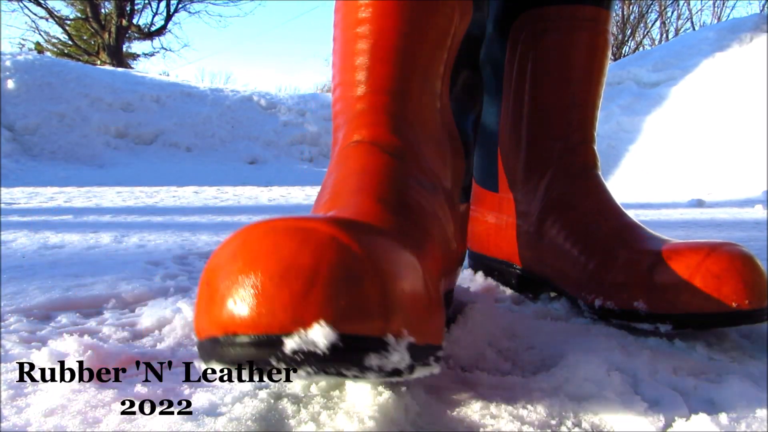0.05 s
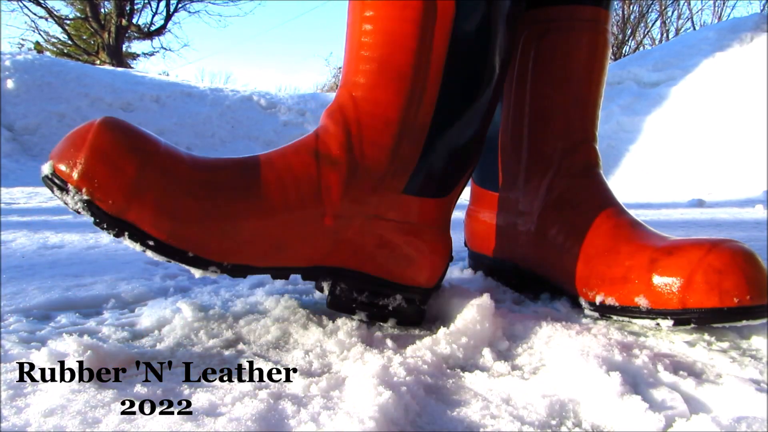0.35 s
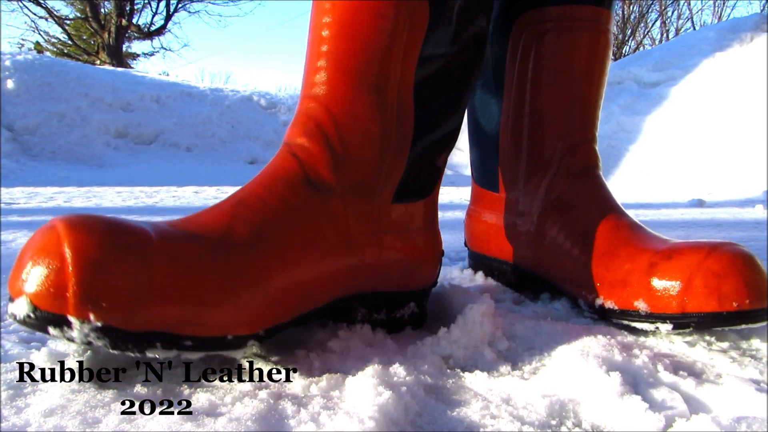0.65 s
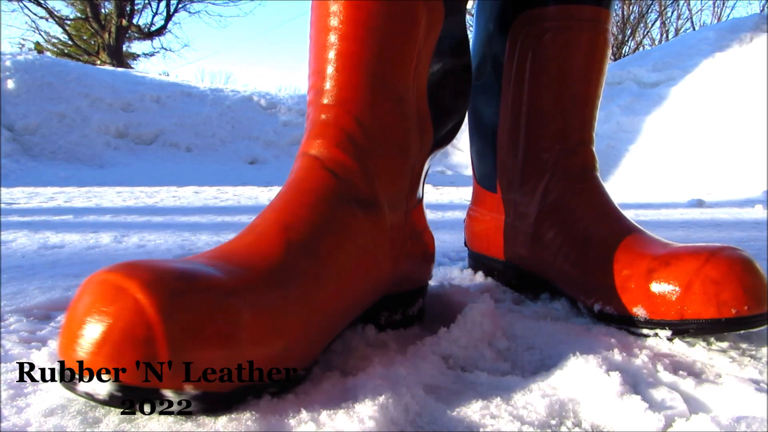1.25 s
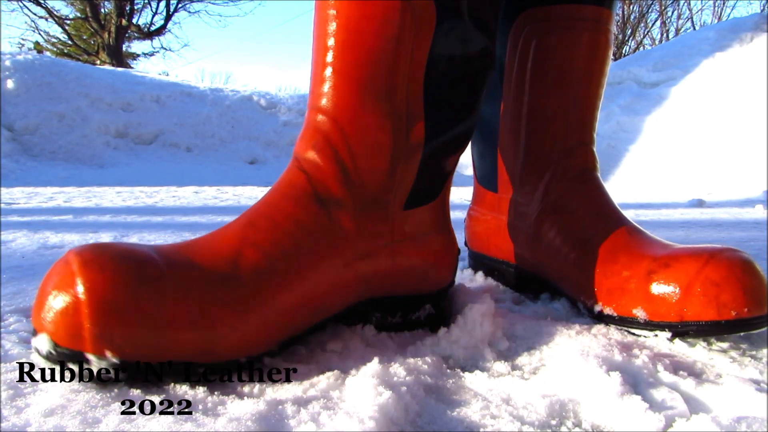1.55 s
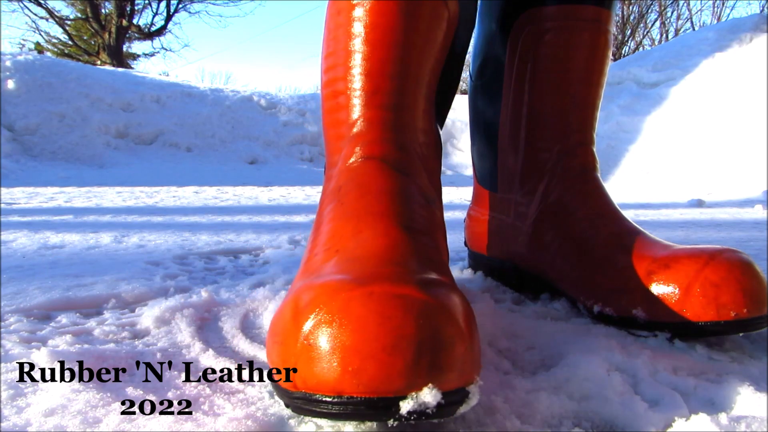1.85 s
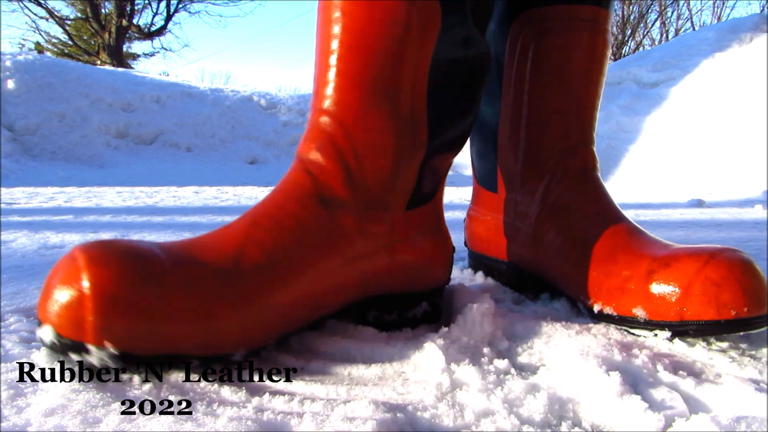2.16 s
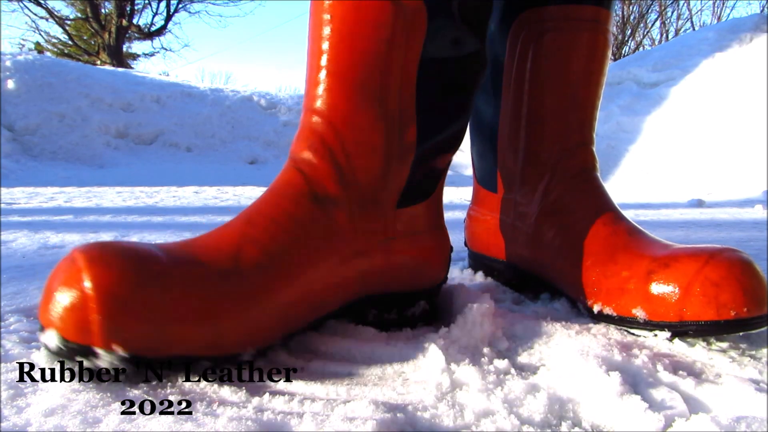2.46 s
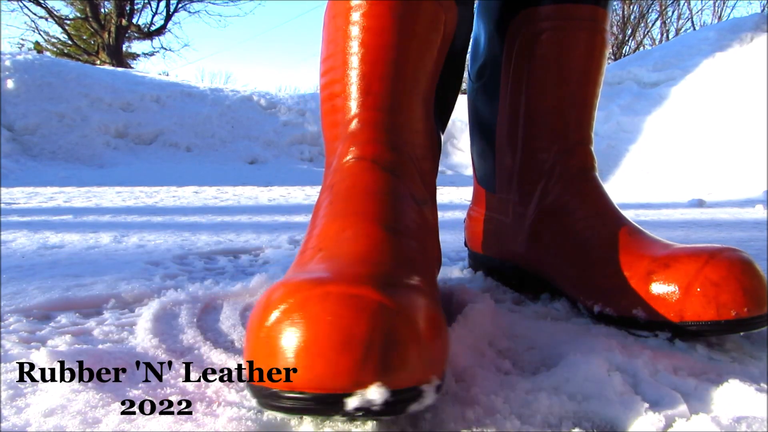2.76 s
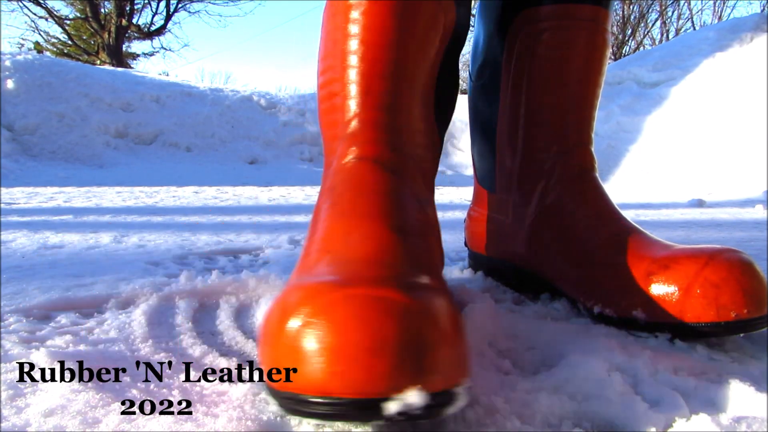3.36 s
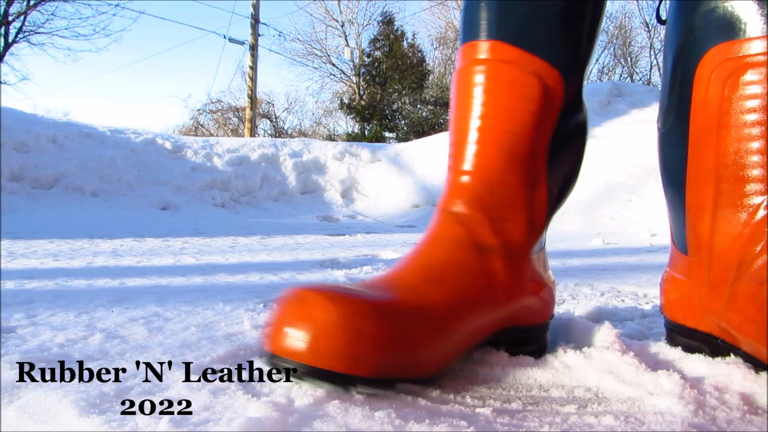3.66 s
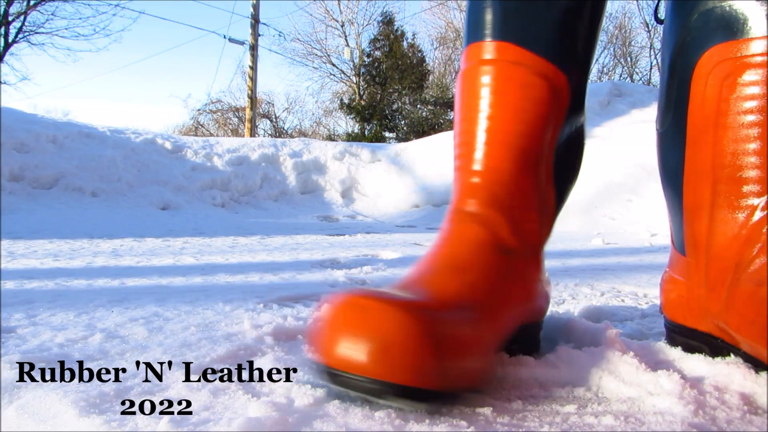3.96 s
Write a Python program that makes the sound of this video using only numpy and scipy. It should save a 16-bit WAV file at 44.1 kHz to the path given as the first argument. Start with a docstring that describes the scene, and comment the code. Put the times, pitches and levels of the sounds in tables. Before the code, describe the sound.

Crusty snow crunches under a rubber boot, close and slightly left. The boot shifts quietly with soft bumps, then sweeps to and fro about twice a second, with ticking ice bits and sharp little cracks. Faint outdoor air lies behind.

```python
"""A light scuff on crusty packed snow, close to the microphone and a little to the left: a rubber boot
shifts, flexes with soft thuds, then sweeps back and forth. Each sweep crushes a dense, jerky shower of
ice grains; loose bits tick, and now and then a piece of crust snaps. Behind it lie distant outdoor air,
a breeze on the microphone and the recorder's thin whine. Near the end the sound drops out for a moment."""
import sys
import numpy as np
from scipy import signal
from scipy.fft import rfft, irfft
from scipy.io import wavfile
from scipy.ndimage import uniform_filter1d

SR = 44100
rng = np.random.default_rng(int(sys.argv[2]) if len(sys.argv) > 2 else 0)


def bounce(signal):
    """Save signal as a 16-bit WAV file at the path given by the first command-line argument."""
    frames = np.transpose(np.atleast_2d(signal))
    limited = np.clip(frames, -1, 1)
    pcm = np.round(limited * 32767).astype(np.int16)
    wavfile.write(sys.argv[1], SR, pcm)


N = 176400

# Grain sizes underfoot: packed snow, crumbs, crust, powder
# (low edge [Hz], high edge [Hz], rate [1/s], size scatter [dB], swell flatness [exponent], sag [dB])
GRAINS = [(60, 496, 3000, 3, 2.544, -4.5), (487, 1592, 3500, 4.5, 2.54, -7.5),
          (1436, 4590, 3500, 3.5, 2.24, -7.5), (3920, 17000, 7000, 4.5, 1.9, -11)]
# Crushed snow from close up (frequency [Hz], level [dB])
SNOW_TONE = [(35, -42.5), (60, -32), (81, -32.5), (135, -9.5), (251, -2), (399, -4.5), (469, -3.5),
             (916, -2.5), (1750, -9), (2780, -10.5), (3500, -15), (4020, -22), (4510, -18.5), (8040, -24.5),
             (10400, -28), (12800, -35.5), (15000, -50)]
# Narrow peaks that colour the crunch, from nearby reflections (frequency [Hz], width [Hz], boost [dB])
CRUNCH_PEAKS = [(250, 34, 1.5), (284, 29, 3.5), (397, 40, 3), (651, 32, 2.5), (825, 15, 5.5),
                (922.1, 22, 5.5), (2216, 230, 2), (2854, 47, 1)]
# Stereo width of the crunch at the microphone (frequency [Hz], side level [dB])
CRUNCH_WIDTH = [(150, -39), (500, -11.5), (1100, -16.5), (2300, -16.5), (3500, -9.5), (6000, -6),
                (12000, -7)]


def snow_crunch(t):
    """Grains of four sizes break under the sole, all jerking together as it catches and slips."""
    hz = np.arange(N // 2 + 1) * SR / N + 1
    peaks_db = sum(db / (1 + (2 * (hz - centre) / width) ** 2) for centre, width, db in CRUNCH_PEAKS)
    tone = curve(SNOW_TONE) * undb(peaks_db)
    jerks_per_s = 170
    shared_jerk_db = 1.15 * wander(jerks_per_s)
    crunch = 0
    for size, (low, high, rate, scatter_db, flatness, sag_db) in enumerate(GRAINS):
        band = tone / np.sqrt((1 + (low / hz) ** 10) * (1 + (hz / high) ** 10))
        mid, side = (unit(colour(shower(rate, scatter_db), band)) for _ in range(2))
        grains = stereo(mid, colour(side, curve(CRUNCH_WIDTH)))
        jerk = unit(undb(shared_jerk_db + .9 * wander(jerks_per_s)))
        crunch = crunch + grains * jerk * sole_pressure(t, size, flatness, sag_db)
    return crunch


# Sweeps of the sole across the snow
# (start [s], hardest [s], end [s], packed snow [dB], crumbs [dB], crust [dB], powder [dB])
SWEEPS = [ (-.15, -0.004, .22, -42, -37, -40.5, -52), (0.034, 0.276, 0.47, -47.5, -48, -47.5, -49.5),
          (0.436, 0.507, .60, -48.5, -52, -49.5, -53), (0.458, 0.697, .90, -45, -41, -49, -51.5),
          (0.688, 0.852, 0.86, -44, -31.5, -37, -50.5), (0.872, 0.953, 0.97, -40.5, -42, -47.5, -48),
          (1.133, 1.194, 1.26, -44.5, -40.5, -51, -51.5), (1.22, 1.234, 1.277, -40, -30.5, -34, -52),
          (1.225, 1.396, 1.46, -32, -27.5, -27, -32), (1.515, 1.73, 1.89, -26.5, -22, -28.5, -36),
          (1.893, 2.211, 2.335, -27.5, -24, -25.5, -35), (2.394, 2.571, 2.729, -25, -21, -26, -35),
          (2.727, 2.961, 3.13, -26.5, -22, -24, -34.5), (3.157, 3.353, 3.495, -25, -23, -29.5, -36),
          (3.513, 3.632, 3.69, -27.5, -26.5, -27.5, -43), (3.648, 3.733, 3.85, -24, -22, -24, -34.5),
          (3.752, 3.896, 3.98, -46, -48.5, -60, -59), (3.887, 3.98, 4.12, -30, -30.5, -38, -41.5)]


def sole_pressure(t, size, flatness, sag_db):
    """Gain of one grain size: each sweep swells to its hardest moment, sags as it grinds on, and stops."""
    edge_db, stop_steepness = -33, 4.9  # level at both ends of a sweep; how abruptly the sole stops
    power = 0
    for start, hardest, end, *levels_db in SWEEPS:
        before = np.clip((hardest - t) / (hardest - start), 0, 2)
        after = np.clip((t - hardest) / (end - hardest), 0, 2)
        swell_db = edge_db * before ** flatness
        fall_db = sag_db * after + (edge_db - sag_db) * after ** stop_steepness
        power = power + undb(levels_db[size] + swell_db + fall_db) ** 2
    return np.sqrt(power)


# Crust breaking under the boot (time [s], knock level [dB], pitch [Hz], tick level [dB])
SNAPS = [(.104, -23, 740, -23.5), (.294, -26.5, 900, -31.5), (0.581, -28.5, 1100, -30),
         (.612, -18, 1400, -31), (.835, -25, 1100, -37), (.957, -27, 700, -25.5), (1.160, -31, 1500, -31.5),
         (1.231, -27, 1000, -32), (1.4114, -12, 1800, -10), (1.6334, -8.5, 830, -18),
         (1.6726, -26, 1496, -13), (1.693, -30, 1463, -17), (1.7055, -25, 1500, -18),
         (1.7087, -24, 1500, -10.5), (1.729, -28, 850, -24), (1.7594, -14, 1400, -20.5),
         (1.7936, -8.5, 1900, -28), (2.238, -30, 1400, -15), (2.409, -29, 350, -44.5),
         (2.465, -15.5, 800, -36), (2.5025, -7.5, 800, -8.5), (2.602, -10.5, 700, -12),
         (2.652, -7.5, 1420, -28), (2.786, -22.5, 1003, -42), (2.8181, -2.5, 1250, -19),
         (2.967, -4.5, 650, -11), (3.088, -26, 1500, -17.5), (3.150, -25.5, 700, -48),
         (3.3176, -24, 1299, -12), (3.724, -12.5, 900, -14.5), (3.951, -16, 700, -23)]
# Colour of a snap at close range (frequency [Hz], gain [dB])
SNAP_TONE = [(40, -29), (130, 0), (260, -1.5), (3000, -0.5), (7000, -1.5), (11000, -4.5), (15000, -18)]


def crust_snaps(t):
    """A piece of crust gives way: a sharp tick, a very short knock and a brief crumble."""
    tick_decay_s, crumble_decay_s, crumble_below_db = .00037, .0061, 19
    knock, tick, crumble = np.zeros((3, N))
    for at, db, hz, tick_db in SNAPS:
        near = (t >= at) & (t < at + .1)
        age = t[near] - at
        knock[near] += undb(db) * damped_swing(age, hz, rise_cycles=.45)
        tick[near] += undb(tick_db) * np.exp(-age / tick_decay_s)
        crumble[near] += undb(db - crumble_below_db) * np.exp(-age / crumble_decay_s)
    bits = unit(colour(shower(per_s=2700, scatter_db=4), curve(SNOW_TONE)))
    crack = stereo(np.sign(rng.standard_normal(N)), rng.random(N) - .5)
    return colour(knock + tick * crack + crumble * bits, curve(SNAP_TONE))


# Thuds of the rubber, near the microphone (time [s], level [dB], pitch [Hz])
THUDS = [(.105, -21.5, 348), (0.236, -37, 75), (0.514, -36.5, 69.6), (.590, -30, 152.5), (.944, -16.5, 216),
         (.953, -31, 247.4), (1.0745, -20.5, 169), (1.084, -35.5, 139), (1.228, -27.5, 130),
         (2.408, -27.5, 280)]


def boot_thuds(t):
    """The rubber boot flexes and bumps the ground."""
    return sum(undb(db) * damped_swing(t - at, hz, rise_cycles=.617, squeeze=2.75)
               for at, db, hz in THUDS)


# Ice bits landing around the boot (frequency [Hz], level [dB])
LOOSE_ICE_TONE = [(300, -17), (1200, 1), (3000, -7), (5000, -2.5), (11000, 3), (15000, -11)]


def loose_ice(t):
    """Loose bits of ice tick on the crust, louder while powder flies."""
    mid, side = (unit(colour(shower(per_s=82, scatter_db=1), curve(LOOSE_ICE_TONE))) for _ in range(2))
    *_, flatness, sag_db = GRAINS[-1]
    powder = sole_pressure(t, -1, flatness, sag_db)
    return undb(-22.5) * stereo(mid, .43 * side) * powder ** .72  # follows 72% of the powder's dB swing


# Open air in the distance (frequency [Hz], level [dB])
AIR_TONE = [(30, -6), (90, -0.5), (220, -1), (550, -4.5), (920, -1.5), (1250, -7), (2500, -16), (4700, -21),
            (8000, -21.5), (11000, -24), (13000, -27.5), (15000, -52)]


def outdoor_air():
    """A wide, distant hush whose level wavers slightly."""
    mid, side = (noise(curve(AIR_TONE)) for _ in range(2))
    return undb(-44.5 + .93 * wander(per_s=6.8)) * stereo(mid, undb(-1) * side)


# Wind rumble right at the microphone (frequency [Hz], level [dB])
BREEZE_TONE = [(15, 12), (40, 22), (80, -1), (130, -16), (300, -36)]


def breeze():
    """A light breeze buffets the microphone in small gusts."""
    mid, side = (noise(curve(BREEZE_TONE)) for _ in range(2))
    gusts = unit(undb(3 * wander(per_s=7.8)))
    return undb(-49.5) * gusts * stereo(undb(-8.5) * mid, side)


def recorder_whine(pitch_hz=7671, half_width_hz=73):
    """The recorder's own faint whistle, a narrow band of noise."""
    hz = np.arange(N // 2 + 1) * SR / N
    return undb(-63) * noise(1 / (1 + ((hz - pitch_hz) / half_width_hz) ** 2))


def undb(db):
    """Decibels to gain."""
    return 10 ** (np.asarray(db) / 20)


def unit(x):
    """Scale to rms 1."""
    return x / np.sqrt(np.mean(x ** 2))


def curve(points):
    """Gain at every frequency from (frequency [Hz], level [dB]) points."""
    hz, db = np.array(points, float).T
    return undb(np.interp(np.log(np.arange(N // 2 + 1) * SR / N + 1), np.log(hz), db))


def colour(x, gain):
    """Filter by a gain per frequency."""
    return irfft(rfft(x) * gain, N)


def noise(gain):
    """Noise of rms 1, shaped by a gain per frequency."""
    return unit(colour(rng.standard_normal(N), gain))


def wander(per_s):
    """Smooth random drift of rms 1."""
    hold = int(SR / per_s)
    steps = rng.standard_normal(2000)[np.arange(N) // hold]
    return unit(uniform_filter1d(steps, hold))


def shower(per_s, scatter_db):
    """Clicks at random moments, with scattered sizes."""
    hits = rng.random(N) < per_s / SR
    polarity = np.sign(rng.standard_normal(N))
    sizes = undb(scatter_db * np.minimum(rng.standard_normal(N), 3))
    return unit(hits * polarity * sizes)


def damped_swing(t, hz, rise_cycles, squeeze=1):
    """A heavily damped sine; its envelope peaks after rise_cycles, and squeeze narrows that peak."""
    age = np.clip(t * hz / rise_cycles, 0, 50)
    return (age * np.exp(1 - age)) ** squeeze * np.sin(2 * np.pi * hz * t)


def stereo(mid, side):
    """Left and right from mid and side."""
    return np.array([mid + side, mid - side])


# The boot's place, left of the microphone (frequency [Hz], left over right [dB])
LEFT_BIAS = [(100, 0), (300, 0.1), (600, 0.5), (1100, 3.5), (2000, 2.3), (4000, 1), (12000, 2)]


def scene():
    """The boot, close and a little to the left, over the outdoor background."""
    t = np.arange(N) / SR
    left, right = snow_crunch(t) + loose_ice(t) + crust_snaps(t) + boot_thuds(t)
    left_lead_rad = .11
    lean = np.sqrt(curve(LEFT_BIAS)) * np.exp(.5j * left_lead_rad)  # each channel takes half
    boot = np.array([colour(left, lean), colour(right, 1 / lean)])
    return boot + outdoor_air() + breeze() + recorder_whine()


# Notches of the microphone housing (frequency [Hz], width [Hz])
HOUSING_NOTCHES = [(3940, 190), (7870, 210)]


def record(dry):
    """The sound drops out briefly; the housing notches the treble and rolls it off, and the top is cut."""
    t = np.arange(N) / SR
    dropout_start_s, dropout_end_s = 3.632, 3.6985
    notch_depth, roll_off_hz, top_hz = .95, 13800, 15200
    sound = dry * ((t < dropout_start_s) | (t > dropout_end_s))
    for hz, width in HOUSING_NOTCHES:
        notched = signal.lfilter(*signal.iirnotch(hz, hz / width, fs=SR), sound)
        sound = sound + notch_depth * (notched - sound)
    sound = signal.sosfilt(signal.butter(8, roll_off_hz, fs=SR, output="sos"), sound)
    return signal.sosfilt(signal.ellip(8, .2, 70, top_hz, fs=SR, output="sos"), sound)


dry = scene()
out = record(dry)
bounce(out)
```